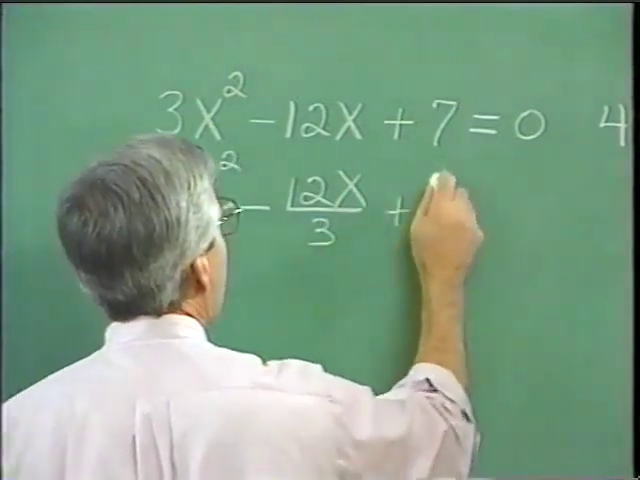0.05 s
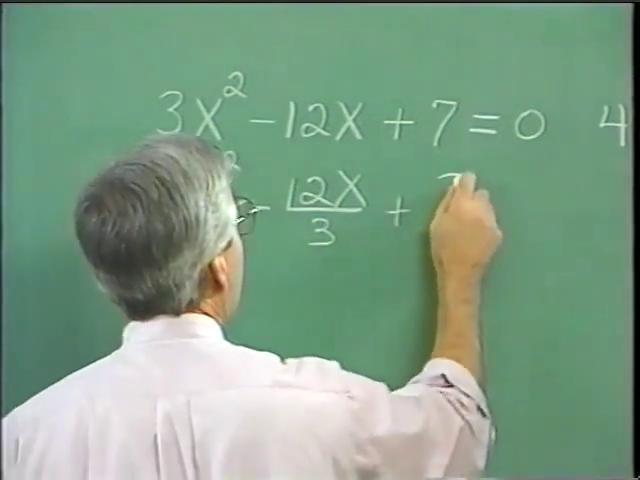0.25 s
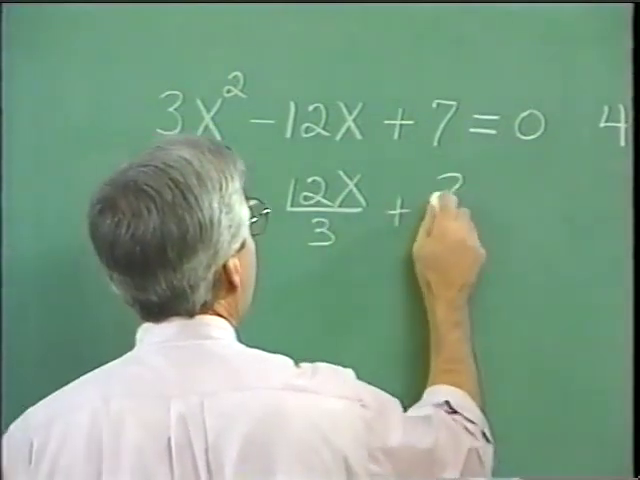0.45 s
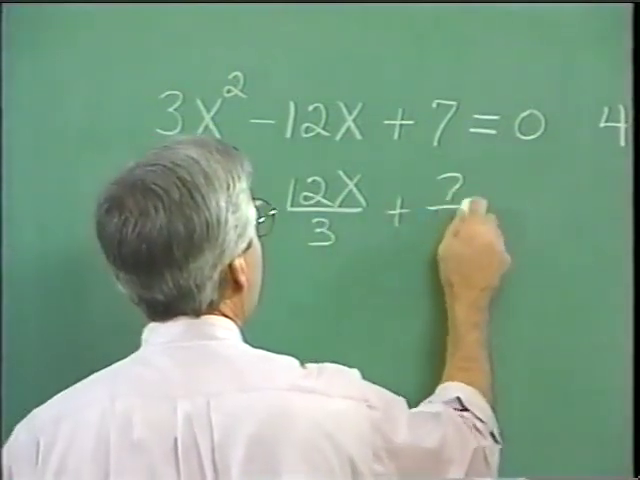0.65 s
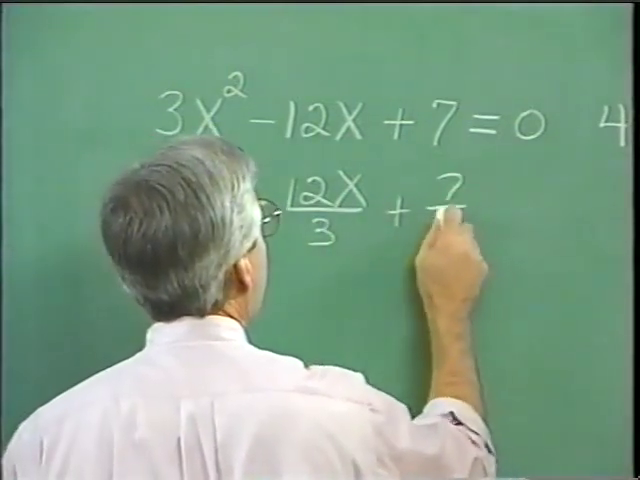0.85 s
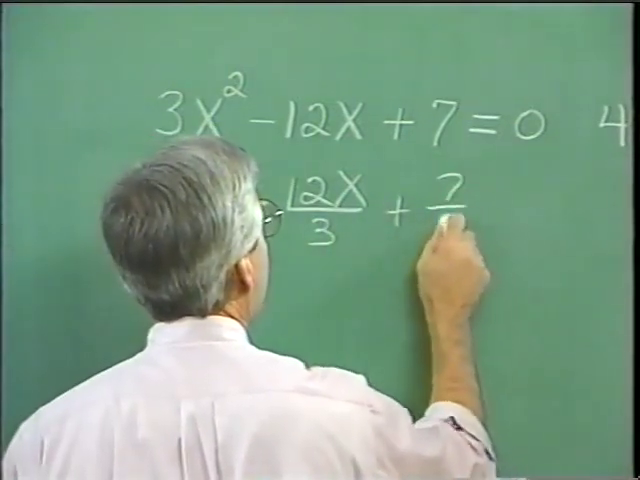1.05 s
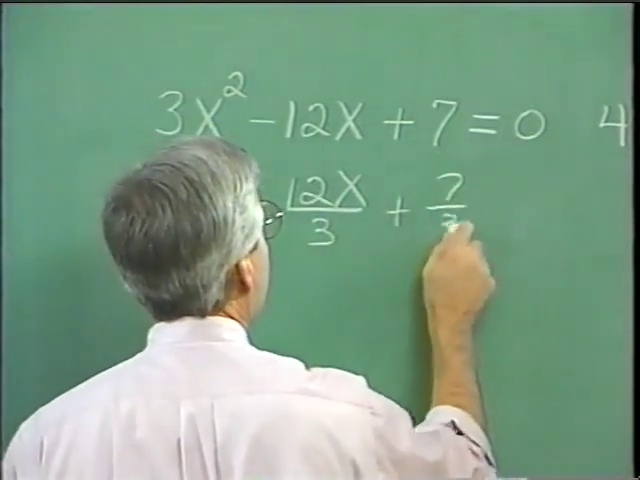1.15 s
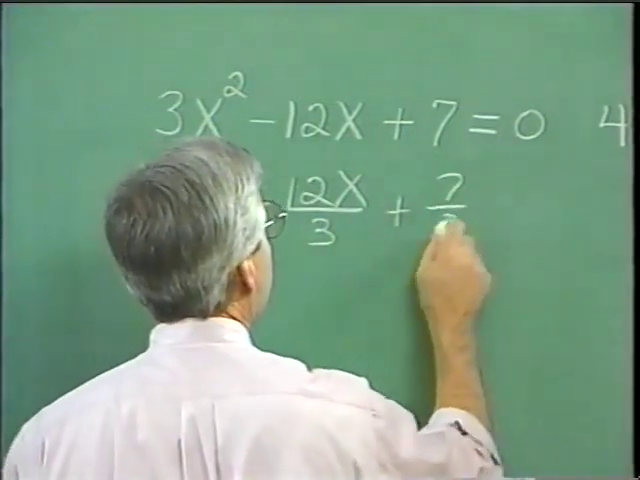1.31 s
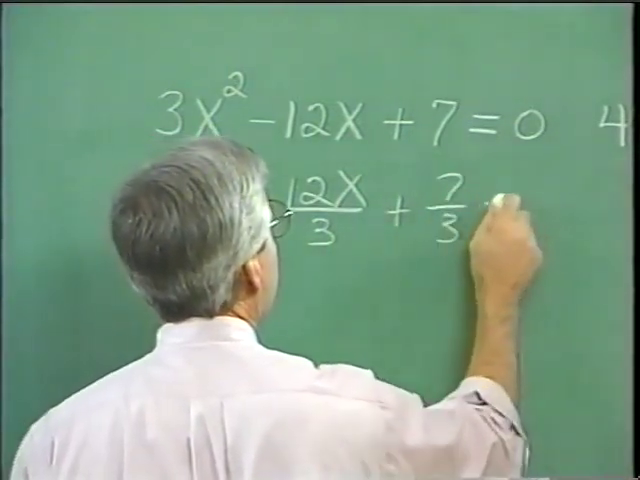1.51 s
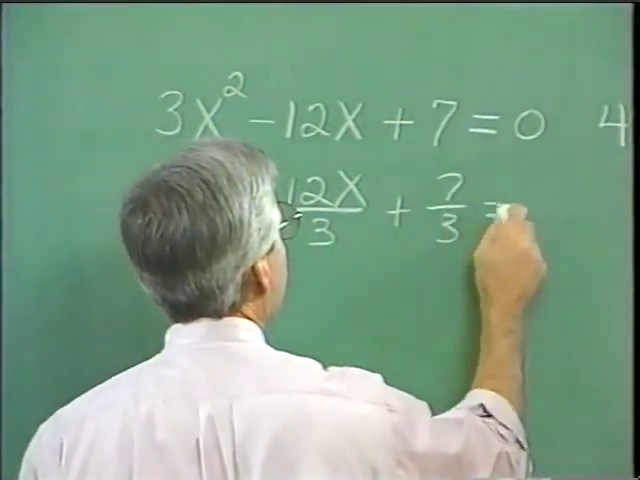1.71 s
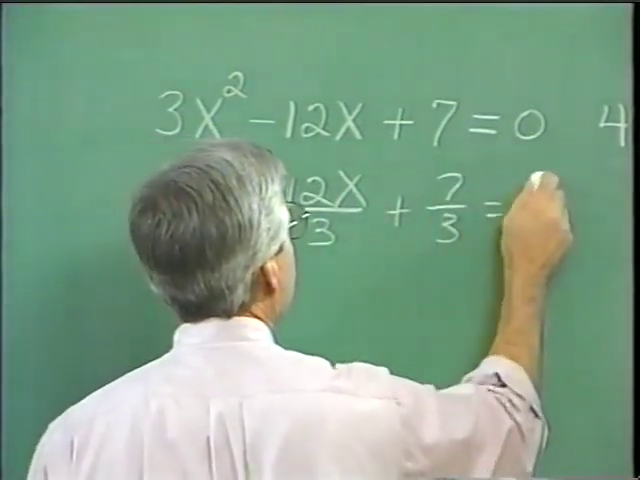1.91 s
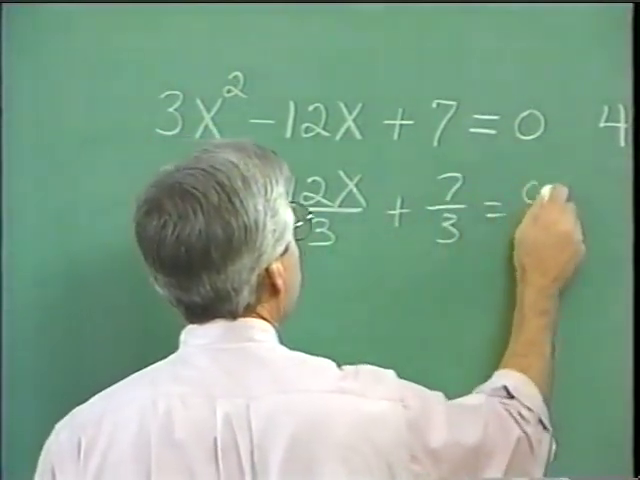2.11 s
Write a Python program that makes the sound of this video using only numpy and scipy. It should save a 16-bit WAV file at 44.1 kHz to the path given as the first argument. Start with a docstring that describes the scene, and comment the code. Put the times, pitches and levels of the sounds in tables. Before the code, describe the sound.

Chalk strikes a classroom chalkboard six times at uneven intervals, each a brittle click with a hollow panel knock and short room ringing; soft scuffs and barely audible sliding fall between, over low rumble and faint hiss, miked fairly close.

```python
"""Six chalk knocks sound on a wall-mounted chalkboard in a classroom as symbols are written.
Each touch is a brittle click with a little chatter, made of short bursts of noise.
The panel answers with a hollow knock of ringing tones and a slow low boom, and fading noise is the room.
Soft scuffs and very faint sliding are shaped noise, over room rumble, hiss and steady electrical tones."""
import sys
import numpy as np
from scipy import signal
from scipy.fft import rfft, irfft
from scipy.io import wavfile
from scipy.ndimage import uniform_filter1d

SR = 44100
rng = np.random.default_rng(int(sys.argv[2]) if len(sys.argv) > 2 else 0)


def generate_wav(sig):
    """Save sig (samples, or channels by samples) to the path in sys.argv[1] as 16-bit PCM at SR."""
    pcm = np.round(np.clip(np.atleast_2d(sig).T, -1, 1) * 32767).astype(np.int16)
    wavfile.write(sys.argv[1], SR, pcm)


N = 95432  # length of the scene [samples]
RING_S = 0.7  # length computed for each touch or scuff [s]

# colour of the panel's crowd of weak, close modes: (frequency [Hz], relative level [dB per Hz])
CROWD_COLOUR = [(80, -32), (200, -9.5), (450, 8.5), (900, 7.5), (1500, -6), (2200, -14.5), (4000, -21.5),
                (8000, -26), (15000, -40.5)]
# how long that crowd takes to fall by 60 dB: (frequency [Hz], fall time [s])
CROWD_FALL = [(150, 0.04), (600, 0.17), (1500, 0.08), (4000, 0.027), (12000, 0.072)]


def from_db(db):
    """Turns decibels into a plain gain."""
    return 10 ** (np.asarray(db) / 20)


def rms_one(x):
    """Scales a sound to an rms (average strength) of 1."""
    return x / np.sqrt(np.mean(x ** 2) + 1e-20)


def energy_one(x):
    """Scales a short sound so that its squared samples add up to 1."""
    return x / np.sqrt(np.sum(x ** 2))


def at_hz(points, hz):
    """Reads a table between its points, on a log-frequency axis."""
    table_hz, values = np.transpose(points)
    return np.interp(np.log(hz), np.log(table_hz), values)


def add(out, start_s, sound):
    """Mixes a sound in at a time, cut off where the output ends."""
    start = max(int(start_s * SR), 0)
    part = sound[:max(len(out) - start, 0)]
    out[start:start + len(part)] += part


def dying(t, t60):
    """A fade that falls by 60 dB in t60 seconds."""
    return np.exp(-np.log(1000) * t / t60)


def building(t, rise_s):
    """A smooth build-up from 0 towards 1."""
    return 1 - np.exp(-t / rise_s)


def ring(t, hz, t60):
    """One struck mode: a sine that starts at height 1 and dies away."""
    return np.sin(2 * np.pi * hz * t) * dying(t, t60)


def noise(spectrum):
    """Steady coloured noise, rms 1."""
    hz = np.maximum(np.fft.rfftfreq(N, 1 / SR), 1)
    white = rfft(rng.standard_normal(N))
    return rms_one(irfft(white * from_db(at_hz(spectrum, hz)), N))


def dying_noise(t, spectrum, t60s, rise_s):
    """Splits noise into third-octave bands, each dying at its own rate; total energy 1."""
    out = 0
    edges = 62 * 2 ** (np.arange(25) / 3)
    hz = np.fft.rfftfreq(len(t), 1 / SR)
    white = rfft(rng.standard_normal(len(t)))
    for low, high in zip(edges, edges[1:]):
        centre = np.sqrt(low * high)
        band = irfft(white * ((hz >= low) & (hz < high)), len(t))
        band = band * dying(t, at_hz(t60s, centre)) * building(t, rise_s)
        # the table is per Hz, so a wider band is stronger
        out = out + rms_one(band) * from_db(at_hz(spectrum, centre)) * np.sqrt(high - low)
    return energy_one(out)


def upper_share(hz):
    """How much a frequency depends on hardness, 0-1: a firm touch brings out the middle modes."""
    centre_hz, width_octaves = 1296, 1.05
    return np.exp(-0.5 * (np.log2(hz / centre_hz) / width_octaves) ** 2)


def hardened(spectrum, hard_db):
    """Raises (or lowers) the middle of a colour table for a firmer (or softer) touch."""
    return [(hz, db + hard_db * upper_share(hz)) for hz, db in spectrum]


def taps():
    """Every touch sounds the tip, the panel and the room."""
    # touches of the chalk: (time [s], knock level [dB], hardness: lift of the middle modes [dB],
    # click level [dB], lift of the chatter [dB], place on the board [-1 left to 1 right])
    touches = [(0.1045, -0.5, -5.5, -4.5, 1, -0.48), (.5122, 3, 0, 2, 11, -0.72),
               (0.8031, 1, 4, 3, 16, -.7), (1.4560, 2.5, -0.5, 1, 33, 0.13),
               (1.6467, -0.23, 0.5, 1.5, 0, -0.026), (1.9037, -2, -7, -3, -18, 0.56)]
    out = np.zeros(N)
    t = np.arange(int(RING_S * SR)) / SR
    for start_s, knock_db, hard_db, click_db, chatter_db, place in touches:
        knock = board(t, hard_db, place) + classroom(t, hard_db)
        click = chalk_click(t, chatter_db)
        add(out, start_s, from_db(knock_db) * knock + from_db(click_db) * click)
    return out


def board(t, hard_db, place):
    """The panel's knock: a first dent, its main modes, the crowd of weak ones and a slow boom."""
    # modes of the panel: (frequency [Hz], level before place and hardness [dB],
    # time to fall by 60 dB [s], build-up time [s], level gained toward the right [dB])
    main_modes = [(89.1, -46.5, 0.31, 0.00088, 6.5), (132.7, -35, 0.11, 0.00088, 0.5),
                  (147.2, -42, 0.567, 0.14, 1.5), (163.56, -46, 0.43, 0.0009, -3),
                  (207, -47, 0.41, 0.017, 0.4), (245.9, -37.5, 0.29, 0.00023, -4.03),
                  (280.3, -41, 0.31, 0.0005, 3.7), (293, -40.5, 0.23, 0.017, -5.5),
                  (351, -45, 0.2, 0.0008, 1), (390.4, -39.5, 0.11, 0.0011, -2.4),
                  (455.4, -32.5, 0.071, 0.00025, 2.64), (510.4, -46.5, 0.14, 0.00067, -6.1),
                  (596.5, -41.5, 0.11, 0.00027, 1.5), (673, -38.5, 0.081, 0.0098, -6.5),
                  (806.4, -49.5, 0.14, 0.00011, -7), (883, -29, 0.04, 0.0043, 4.2),
                  (980, -61, 0.15, 0.0003, 9.7), (1159, -53.5, 0.037, 0.00017, -15.5),
                  (1438, -37.5, 0.011, 0.00095, -5), (1610, -59.5, 0.063, 0.0001, -9),
                  (1830, -53.5, 0.023, 0.0048, -16.5)]
    dent_hz, dent_db, dent_t60_s = 1170, -27.5, 0.0018  # under the tip
    crowd_db, crowd_rise_s = -17, 0.00047
    boom_hz, boom_db, boom_rise_s, boom_t60_s = 57.6, -26, 0.075, 0.32
    damp_s = 0.15  # the ring is choked to half height after this long

    modes = 0
    for k, (hz, db, t60, rise_s, right_db) in enumerate(main_modes):
        gain = from_db(db + right_db * place + hard_db * upper_share(hz))
        sign = -(-1) ** k  # neighbouring modes start in opposite directions
        modes = modes + sign * gain * ring(t, hz, t60) * building(t, rise_s)
    dent = -from_db(dent_db) * ring(t, dent_hz, dent_t60_s)
    crowd = dying_noise(t, hardened(CROWD_COLOUR, hard_db), CROWD_FALL, crowd_rise_s)
    # the whole panel swings on its mounts
    boom = from_db(boom_db) * ring(t, boom_hz, boom_t60_s) * building(t, boom_rise_s) ** 2
    choke = 1 / (1 + (t / damp_s) ** 6)
    return dent + from_db(crowd_db) * crowd + (modes + boom) * choke


def chalk_click(t, chatter_db):
    """The brittle tip cracks against the slate and chatters for a few milliseconds; two near echoes follow."""
    # further contacts within one touch: (delay [s], level before the touch's own chatter lift [dB])
    contacts = [(.0017, -6), (.004, -11.5)]
    # colour of the crack: (frequency [Hz], relative level [dB])
    crack_colour = [(1000, -40), (2500, 6), (5000, 4.5), (8000, 1.5), (11000, -8.5), (15500, -9.5)]
    # the click thrown back by nearby surfaces: (delay [s], level against the click [dB])
    reflections = [(.0085, -22), (0.0215, -17)]
    crack_db, crack_t60_s = -32, 0.0046
    even_hz = 503  # the crack's colour is evened out over this width

    envelope = dying(t, crack_t60_s)
    for delay_s, db in contacts:
        add(envelope, delay_s, from_db(db + chatter_db) * dying(t, crack_t60_s))
    bins = rfft(rng.standard_normal(len(t)) * envelope)
    hz = np.fft.rfftfreq(len(t), 1 / SR)
    # divide out the noise's own broad ups and downs, then give it the crack's colour
    power = uniform_filter1d(np.abs(bins) ** 2, size=int(even_hz / hz[1]))
    uneven = np.sqrt(power + 1e-18)
    coloured = bins / uneven * from_db(at_hz(crack_colour, np.maximum(hz, 1)))
    click = irfft(coloured, len(t)) * (t < RING_S / 2)  # drops what wraps round to the end
    click = from_db(crack_db) * energy_one(click)
    out = click.copy()
    for delay_s, db in reflections:
        add(out, delay_s, from_db(db) * click)
    return out


def classroom(t, hard_db):
    """The room's brief ringing: noise that builds up quickly and dies at a different rate in each band."""
    # colour of the reverberation: (frequency [Hz], relative level [dB per Hz])
    room_colour = [(60, -26), (130, -18), (280, 4), (500, 8), (850, 0.5), (1400, -10), (2200, -17.5),
                   (4000, -27.5), (8000, -33.5), (15000, -43.5)]
    # time the reverberation takes to fall by 60 dB: (frequency [Hz], fall time [s])
    room_fall = [(100, 0.74), (300, 0.35), (800, 0.25), (2000, 0.24), (5000, 0.34), (12000, 0.48)]
    room_db, rise_s = -18, 0.0052
    return from_db(room_db) * dying_noise(t, hardened(room_colour, hard_db), room_fall, rise_s)


def scuffs():
    """The chalk catches softly and stirs the panel's crowd of weak modes."""
    # small scuffs where the stroke turns: (time [s], level [dB])
    catches = [(.358, -48.5), (0.669, -44.5), (1.826, -67)]
    hard_db, rise_s = 6, 0.0041
    out = np.zeros(N)
    t = np.arange(int(RING_S * SR)) / SR
    for start_s, db in catches:
        scuff = dying_noise(t, hardened(CROWD_COLOUR, hard_db), CROWD_FALL, rise_s)
        add(out, start_s, from_db(db) * scuff)
    return out


def sliding():
    """Faint friction noise, in fine grains and small lumps, that swells and fades with each stroke."""
    # chalk sliding: (start [s], length [s], level [dB])
    slides = [(0.207, 0.14, -83), (0.592, 0.094, -90), (0.884, 0.25, -85), (1.102, 0.2, -83.5),
              (1.715, 0.27, -93), (1.94, .16, -81)]
    # colour of the friction: (frequency [Hz], relative level [dB per Hz])
    slide_colour = [(400, 12), (1000, 13), (2000, -22.5), (5000, -1), (8500, 2), (12000, -6), (15500, -22)]
    grain_db, lump_db = 2.5, 1.5  # typical size of the level changes

    pressure = np.zeros(N)
    for start_s, length_s, db in slides:
        add(pressure, start_s, from_db(db) * signal.windows.tukey(int(length_s * SR), 0.5))
    # random levels averaged over about 2 ms and 20 ms
    grain = rms_one(uniform_filter1d(rng.standard_normal(N), size=80))
    lumps = rms_one(uniform_filter1d(rng.standard_normal(N), size=900))
    friction = noise(slide_colour) * from_db(grain_db * grain + lump_db * lumps)
    return pressure * rms_one(friction)


def background():
    """Room rumble and hiss from coloured noise, with steady electrical tones from sines."""
    # colour of the rumble and hiss: (frequency [Hz], relative level [dB per Hz])
    floor_colour = [(20, -4), (40, -2.5), (58, -2), (85, -0.5), (130, -8), (200, -7.5), (300, -17),
                    (500, -26), (1000, -32), (2000, -37.5), (5000, -41), (10000, -42.5), (15500, -42)]
    # electrical tones: (frequency [Hz], rms level [dB])
    whines = [(59.5, -66.5), (3338, -94), (5006, -94.5), (15735, -91)]
    floor_db = -66
    t = np.arange(N) / SR
    tones = np.zeros(N)
    for hz, db in whines:
        cycles = hz * t + rng.random()  # random starting point
        tones += from_db(db) * np.sqrt(2) * np.sin(2 * np.pi * cycles)
    return from_db(floor_db) * noise(floor_colour) + tones


def side_hiss():
    """A trace of noise with opposite sign in the left and right channels."""
    # its colour: (frequency [Hz], relative level [dB per Hz])
    side_colour = [(30, 24), (60, 44), (150, -2), (500, 17), (2000, 9.5), (15000, -0.5)]
    return from_db(-83) * noise(side_colour) * [[1], [-1]]


def scene():
    """Both channels carry the same sound, the right slightly louder, plus the trace of side noise."""
    balance_db = 0.18  # taken from the left, given to the right
    mono = taps() + scuffs() + sliding() + background()
    return mono * from_db([[-balance_db], [balance_db]]) + side_hiss()


def record(dry):
    """Cuts the top steeply with a low-pass filter."""
    cutoff_hz = 16200
    low_pass = signal.ellip(10, 0.1, 70, cutoff_hz, fs=SR, output="sos")
    return signal.sosfilt(low_pass, dry)


dry = scene()
out = record(dry)
generate_wav(out)
```